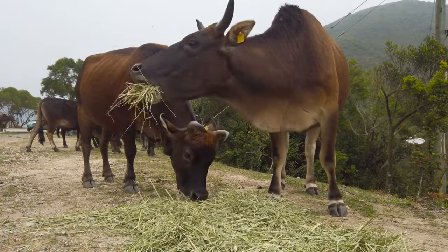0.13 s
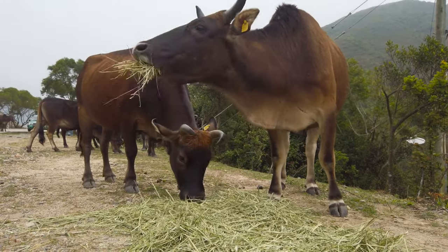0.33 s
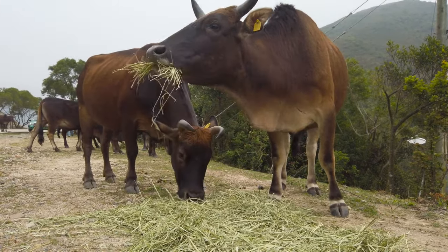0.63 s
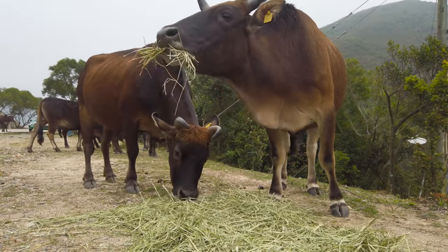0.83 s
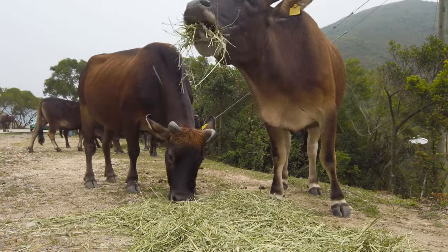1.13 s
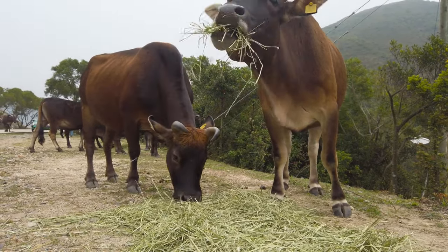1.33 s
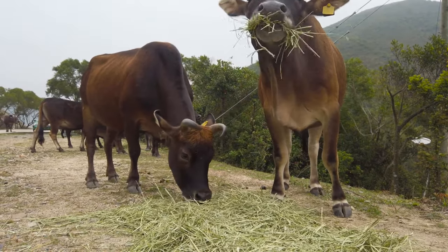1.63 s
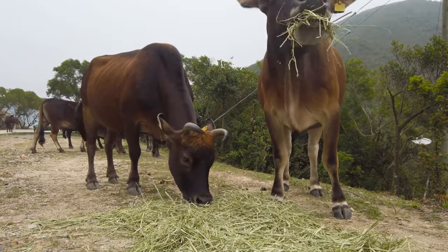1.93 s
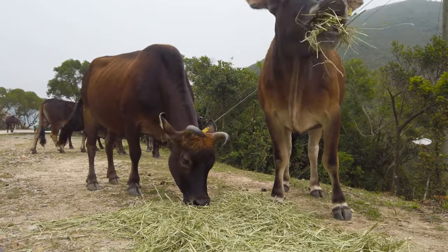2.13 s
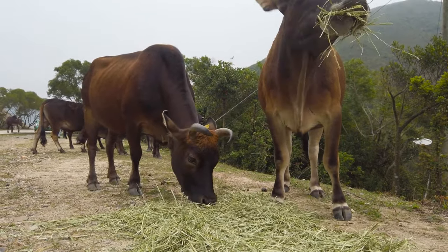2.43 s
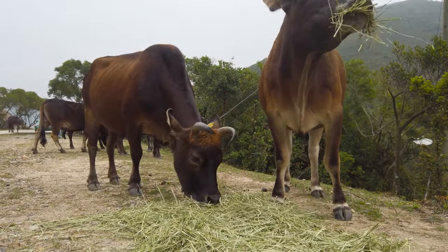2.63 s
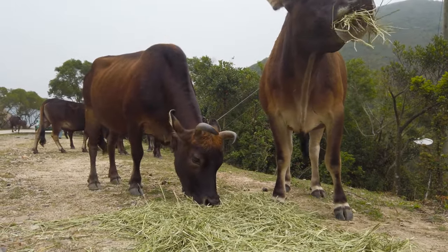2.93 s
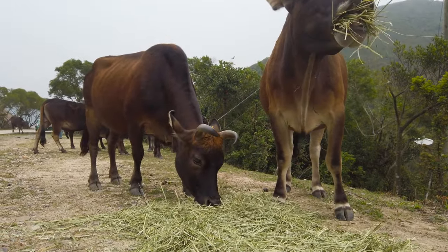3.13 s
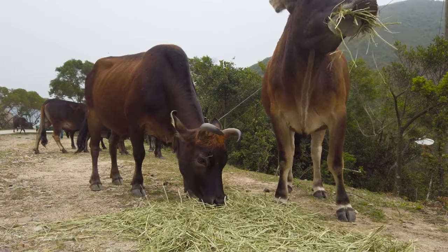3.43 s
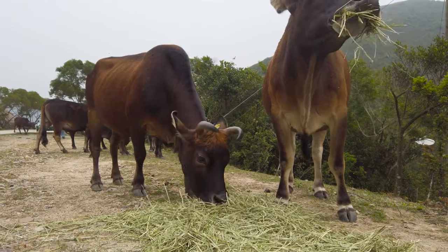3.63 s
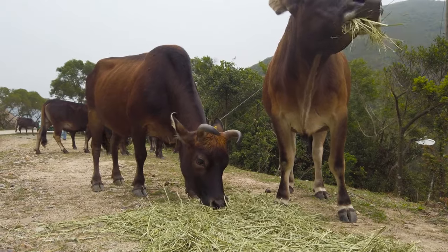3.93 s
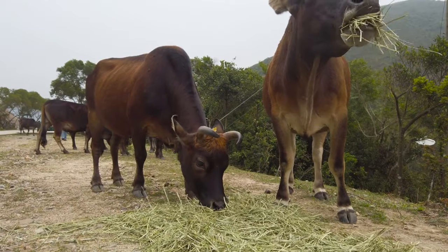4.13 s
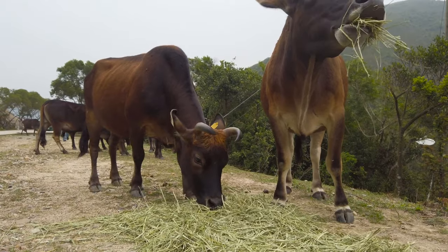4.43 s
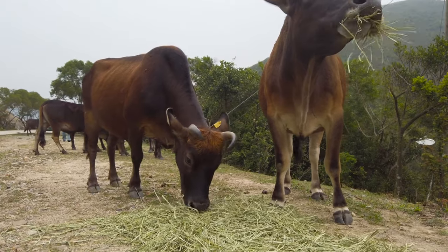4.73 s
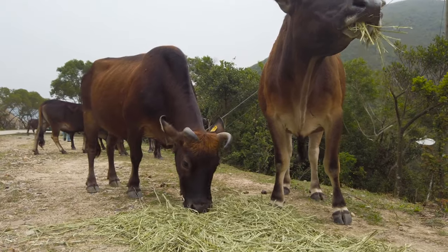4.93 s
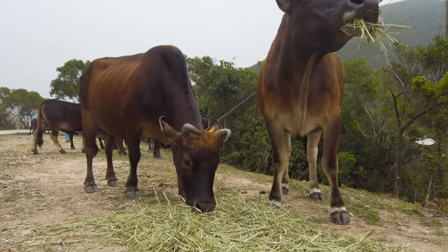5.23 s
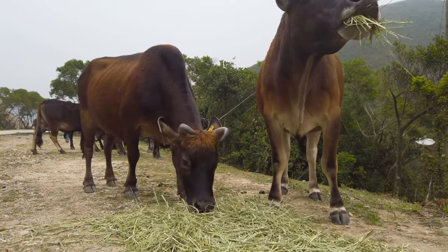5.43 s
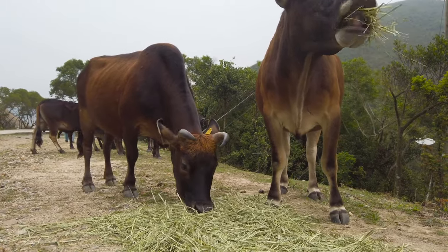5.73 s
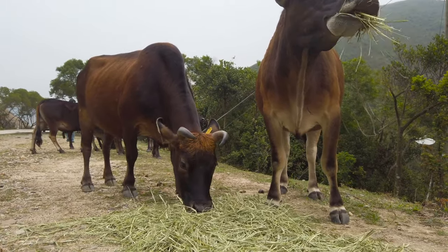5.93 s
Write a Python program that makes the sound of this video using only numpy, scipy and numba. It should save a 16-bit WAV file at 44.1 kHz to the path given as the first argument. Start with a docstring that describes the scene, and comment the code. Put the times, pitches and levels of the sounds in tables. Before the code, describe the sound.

Cattle crunch and grind dry hay at close range, stalks snapping and rustling, while low wind rumbles against the microphone on an open hillside.

```python
"""Cattle tear and chew hay a step or two from a small two-port microphone on an open hillside.
From the start, filtered noise makes wind buffets and the soft hiss of the far slope.
Showers of short rings make the jaw's grind and the rustle and steady crunch of hay; strokes and stirs swell.
Dull jaw knocks, each one low ring, start almost at once. A moment later come bites, denser crunching,
and single stalks snapping in small groups of rings. Later, straws tick and the hardest stalks pop."""
import sys
import numpy as np
from scipy import signal
from scipy.io import wavfile
from scipy.ndimage import uniform_filter1d
from numba import njit

SR = 44100
rng = np.random.default_rng(int(sys.argv[2]) if len(sys.argv) > 2 else 0)


def master(y):
    """Save y as 16-bit WAV."""
    cut = np.clip(np.atleast_2d(y).T, -1, 1)
    pcm = np.round(cut * 32767)  # scale
    wavfile.write(sys.argv[1], SR, pcm.astype(np.int16))


N = 267598  # length [samples]

# Wind pushing on the microphone: (time [s], relative rumble level [dB])
WIND_GUSTS = [(0.0, -21.5), (0.45, -18.5), (0.68, -23.5), (0.88, -17.5), (1.12, -32), (1.48, -17.5),
              (1.66, -29.5), (1.92, -24.5), (2.25, -34), (2.88, -20.5), (3.15, -26), (3.45, -28.5),
              (3.68, -23), (3.85, -29.5), (4.2, -28.5), (4.32, -19.5), (4.6, -24.5), (5.85, -24.5),
              (6.07, -29.5)]
# Puffs of quicker eddies: (start [s], hold [s], relative flutter level [dB])
WIND_PUFFS = [(0.0, 0.041, -26), (0.743, 0.033, -22.5), (0.868, 0.027, -25), (1.13, 0.034, -32),
              (1.266, 0.022, -24.5), (1.362, 0.14, -35), (1.666, 0.11, -34.5), (2.102, 0.071, -35.5),
              (2.327, 0.077, -28), (2.515, 0.15, -24.5), (4.236, 0.041, -24.5), (4.454, 0.31, -35.5),
              (5.113, 0.046, -31)]
FLUTTER_REST_DB = -38.5  # relative level between puffs

# Colour of the far slope's hiss: (frequency [Hz], relative level per Hz [dB])
SLOPE_COLOUR = [(35, -30), (60, 0), (103, -22), (176, -2.5), (354, -15), (437, -15.5), (2190, -19.5),
                (2460, -28.5), (12000, -30.5), (15900, -48)]
SLOPE_DB = -42  # rms, before the hollows and the ground

# Grinding strokes of the jaw: (start [s], hold [s], level before filtering [dB], pitch [Hz])
JAW_STROKES = [(0.027, 0.03, -34.5, 261), (0.132, 0.034, -32, 246), (0.534, 0.036, -32.5, 292),
               (0.706, 0.053, -37, 161), (1.056, 0.023, -35, 176), (1.226, 0.093, -33, 261),
               (1.422, 0.1, -33.5, 180), (1.697, 0.073, -35, 202), (2.11, 0.3, -39, 180),
               (2.556, 0.19, -36, 180), (3.039, 0.044, -40.5, 258), (3.594, 0.094, -35.5, 288),
               (3.963, 0.024, -37, 234), (4.299, 0.04, -34.5, 228), (4.443, 0.13, -34.5, 208),
               (4.702, 0.026, -33, 238), (4.84, 0.035, -34, 193), (5.178, 0.15, -40.5, 216),
               (5.944, 0.13, -43.5, 244)]
GRIND_REST_DB, GRIND_REST_HZ = -40.5, 180  # steady grinding, before filtering
# Loose hay stirred: (start [s], hold [s], rustle level [dB])
HAY_STIRS = [(0.0, .33, -50.5), (0.575, 0.045, -45.5), (0.843, 0.045, -45), (1.197, 0.42, -51),
             (1.714, 0.1, -46), (3.48, 0.036, -49), (4.147, 0.1, -46.5), (4.492, 0.18, -49),
             (4.758, 0.025, -44), (5.27, 0.074, -42.5), (5.623, 0.034, -45), (5.773, 0.19, -46.5)]
RUSTLE_REST_DB = -52.5
# Bites, stalks crushed between the molars:
# (start [s], hold [s], thick stalk level before filtering [dB], thin stalk level before filtering [dB])
MOLAR_BITES = [(0.139, 0.027, -36, -47), (1.19, 0.083, -41.5, -53), (1.261, 0.049, -35.5, -43),
               (1.327, 0.15, -40.5, -67), (1.634, 0.11, -45, -53.5), (1.749, 0.043, -35, -43.5),
               (2.096, 0.042, -44, -44), (2.17, 0.025, -57, -49), (2.292, 0.032, -48, -49.5),
               (2.615, 0.16, -42.5, -54), (2.87, 0.021, -41.5, -52), (3.262, 0.09, -44.5, -54),
               (3.454, 0.02, -52, -52), (3.485, 0.027, -39, -62), (3.62, 0.025, -39, -60),
               (3.671, 0.024, -37, -46), (3.697, 0.044, -45, -51), (4.109, 0.061, -38.5, -49),
               (4.438, 0.065, -38, -51), (4.563, 0.1, -50, -52), (5.285, 0.054, -44, -56),
               (5.67, .02, -40, -69), (5.927, 0.086, -39.5, -52)]
THICK_REST_DB, THIN_REST_DB = -45.5, -47  # steady chewing, before filtering
LOUD_SHARE = 0.985  # under 1 keeps a random grain from towering over the rest

# Jaw knocks: (time [s], size before filtering [dB], pitch [Hz], time to fade 60 dB [s])
JAW_KNOCKS = [(0.022, -27.5, 201, 0.1), (0.132, -17, 157, 0.038), (0.275, -21, 211, 0.037),
              (1.063, -17, 142, 0.056), (2.132, -23.5, 152, 0.085), (2.46, -25.5, 222, 0.065),
              (2.847, -28, 199, 0.13), (3.067, -29, 188, 0.081), (3.669, -22, 335, 0.095),
              (3.958, -16, 246, 0.025), (4.288, -21, 200, 0.04), (4.5, -24, 207.3, 0.34),
              (4.696, -20, 270, 0.1), (4.855, -14, 150, 0.035), (5.193, -24, 248, 0.051)]

# Single stalks breaking: (time [s], woody ring size [dB], woody ring pitch [Hz],
# crack size before filtering [dB], crack pitch [Hz])
STALK_SNAPS = [(0.142, -31, 1380, -26, 2050), (0.313, -36.5, 1100, -29.5, 2130),
               (0.447, -45, 990, -28, 2680), (0.497, -36, 1010, -24.5, 3900), (0.607, -42, 510, -20, 4270),
               (0.783, -32, 530, -22.5, 3100), (0.975, -33.5, 685, -36, 2000),
               (1.068, -25.5, 1500, -34, 2080), (1.1875, -32, 1150, -35, 1300),
               (1.214, -31, 700, -41, 1500), (1.27, -28.5, 1000, -36, 2800), (1.281, -32, 890, -30, 2200),
               (1.309, -29, 515, -37, 2000), (1.684, -37, 800, -26, 2400), (1.76, -28, 1170, -28, 3520),
               (1.898, -31.5, 840, -32, 2200), (2.053, -44, 1000, -26, 4200), (2.176, -39, 503, -23, 4230),
               (2.5165, -36, 1000, -23, 1500), (2.667, -31.5, 775, -34, 1980),
               (2.747, -35.5, 1210, -31, 1500), (2.8544, -28.5, 500, -34, 1600),
               (2.861, -26, 523, -39, 1000), (3.313, -32.5, 920, -31, 2780), (3.4515, -37, 2000, -26, 2700),
               (3.465, -38, 2000, -27, 2680), (3.6125, -31, 890, -25, 2000),
               (3.6185, -30, 930, -26.5, 3000), (3.6672, -27, 800, -18, 2670),
               (3.6735, -33, 720, -20, 2370), (3.709, -37, 1200, -37, 1700), (3.725, -32, 1240, -41, 2000),
               (3.744, -34, 1520, -41, 1700), (4.289, -27.5, 513, -33, 1500),
               (4.453, -29.5, 715, -47, 2800), (4.5936, -33, 4040, -19.5, 1900),
               (4.601, -33, 1400, -42, 1990), (4.6435, -29, 775, -20, 2750), (4.651, -36, 760, -40, 1400),
               (4.858, -33, 1530, -45, 2430), (5.0665, -42, 1910, -25.5, 2220),
               (5.285, -33.5, 760, -36, 2220), (5.672, -35, 720, -43, 1800), (5.955, -29.5, 520, -21, 2070),
               (6.03, -29, 440, -40, 1500)]
# Thin dry straws ticking: (time [s], size [dB], pitch [Hz])
STRAW_TICKS = [(0.859, -37, 7420), (1.6906, -38, 6820), (1.801, -28, 10700), (2.2323, -36, 5780),
               (2.9217, -40, 6770), (5.2764, -36, 5760), (5.321, -34, 5890)]
# Hard stalks popping: (time [s], size before filtering [dB], pitch [Hz])
STALK_POPS = [(2.8548, -10.5, 895), (3.619, -13, 1300), (3.6731, -17, 1150), (4.2884, -13, 1100),
              (5.672, -11.5, 1100)]

# Hollows of mouth and skull: (centre [Hz], width [Hz], boost or cut [dB])
MOUTH_HOLLOWS = [(360.3, 69, 7.5), (443, 108, -3), (498, 16.6, 6), (1220, 154, 2)]
GROUND_MS, GROUND_DB = 1.423, -15  # delay and gain of the echo, before its filter
OFFSET, TOP_HZ = -0.0094, 15780  # the converter's shift off zero and its upper limit


def undb(db):
    """Turn decibels into a gain."""
    return 10 ** (np.asarray(db) / 20)


def level(x, db):
    """Scale a sound to a given rms level."""
    return x * undb(db) / np.sqrt(np.mean(x ** 2))


def band(x, lo_hz, hi_hz, order=2):
    """Keep the part of a sound between two frequencies."""
    edges = [lo_hz, min(hi_hz, 0.45 * SR)]
    return signal.sosfilt(signal.butter(order, edges, "bandpass", fs=SR, output="sos"), x)


def walk(rate):
    """Random values held 1 / rate seconds and smoothed twice; spread near 1."""
    k = int(SR / rate)
    steps = np.repeat(rng.standard_normal(N // k + 1), k)
    return 1.3 * uniform_filter1d(uniform_filter1d(steps, k), k)[:N]


def swells(start, hold, db, rise_s, fall_s):
    """Power of each event over time: it rises 10 dB in rise_s, holds, and falls 10 dB in fall_s."""
    t = np.arange(0, N, 32) / SR - start[:, None]  # one value per 32 samples
    before = np.maximum(-t / rise_s, 0)
    after = np.maximum((t - hold[:, None]) / fall_s, 0)
    power = undb(2 * (db[:, None] - 10 * (before + after)))
    return np.repeat(power, 32, axis=1)[:, :N]


def gain(power, rest_db):
    """Events add their power to a steady level; the summed gain is smoothed."""
    return uniform_filter1d(np.sqrt(power.sum(axis=0) + undb(2 * rest_db)), size=64)


@njit
def ring(s, hz, t60, size, lag_s, tilt):
    """Each grain is a fading sine that reaches the left port lag_s after the right one."""
    out = np.zeros((2, N))
    for k in range(len(s)):
        rate = complex(-np.log(1000) / t60[k], 2 * np.pi * hz[k])
        turn = np.exp(rate / SR)  # one sample of turning and fading
        for c in range(2):
            t = (s[k] + (lag_s[k] if c == 0 else 0.)) * SR
            first = int(np.ceil(t))
            port_size = size[k] * (tilt[k] if c == 0 else 1 / tilt[k])
            z = port_size * np.exp(rate * (first - t) / SR)  # the start may fall between samples
            for j in range(max(first, 0), min(first + int(t60[k] * SR), N)):
                out[c, j] += z.imag
                z *= turn
    return out


def heard(s, hz, t60, size, lag_ms=0.0735, spread_ms=0.073, pan_db=-2.5, spread_db=4.0):
    """Grains reach the right port first on average, each from its own spot; negative pan is louder right."""
    lag_spot, pan_spot = rng.standard_normal((2, len(s)))
    lag_s = (lag_ms + spread_ms * lag_spot) / 1000
    tilt = undb((pan_db + spread_db * pan_spot) / 2)
    return ring(s, np.clip(hz, 20, 0.45 * SR), t60, size, lag_s, tilt)


def grains(count, hz, octaves, cycles, scatter_db, clump_db, clump_rate, **where):
    """A dense random shower of short rings in clumps, pitched round hz, rms 1; each fades 60 dB in cycles."""
    when, detune, loudness, sign = rng.random((4, count))
    at = (when * (N - 1)).astype(int)
    pitch = (hz + np.zeros(N))[at] * 2 ** (octaves * (detune - 0.5))
    scatter = -scatter_db * np.log(1 - LOUD_SHARE * loudness)
    clumps = clump_db * np.tanh(walk(clump_rate)[at])
    size = np.sign(sign - 0.5) * undb(scatter + clumps)
    return level(heard(when * N / SR, pitch, cycles / pitch, size, **where), 0)


def splinters(s, db, hz, t60, span_s, octaves, count, below=0.36):
    """A break comes in a few splinters within milliseconds, spread over a range round its pitch."""
    rank = np.tile(np.arange(count), len(s))
    s, db, hz, octaves = np.repeat([s, db, hz, octaves + np.zeros(len(s))], count, axis=1)
    delay, detune, sign = rng.random((3, len(s)))
    later = rank > 0  # the first splinter is the strongest and keeps the given pitch
    step = later * ((rank - detune) / (count - 1) - below)
    size = np.where(later, np.sign(sign - 0.7), -1) * undb(db - 9.0 * later)
    when = s + later * span_s * delay ** 2
    return heard(when, hz * 2 ** (octaves * step), np.full(len(s), t60), size, spread_db=-1.5)


def wind():
    """Eddies push both ports nearly alike: a deep rumble and a quicker flutter that comes in puffs."""
    s, db = np.transpose(WIND_GUSTS)
    rumble_gain = undb(np.interp(np.arange(N) / SR, s, db))
    puffs = swells(*np.transpose(WIND_PUFFS), rise_s=0.017, fall_s=0.033)
    flutter_gain = gain(puffs, FLUTTER_REST_DB)
    slow, mid, side, fast = rng.standard_normal((4, N))
    rumble = level(band(slow, 4.5, 16.2), -4.5) + level(band(mid, 13.5, 27.1), -0.62)
    flutter = level(band(fast, 31.2, 76.0) * undb(walk(20)), -0.99)
    apart = level(band(side, 5.4, 38), -25.0) * np.array([[1], [-1]])  # opposite in the two ports
    port_gain = undb([[-0.2], [0.2]])
    return (rumble_gain * (rumble + apart) + flutter_gain * flutter) * port_gain


def slope():
    """Grass and bushes hiss in half-octave bands that flicker alone; the ports differ less in the bass."""
    out = 0
    colour_hz, colour_db = np.transpose(SLOPE_COLOUR)
    for hz in 120 * 2 ** np.arange(0, 7.2, 0.5):
        mid, side = band(rng.standard_normal((2, N)), hz / 1.13, hz * 1.36, order=1)
        db = np.interp(np.log(hz), np.log(colour_hz), colour_db)
        flicker_db = 0.8 * walk(9)
        width = min(hz / 720.0, 1.1)
        out = out + undb(db + flicker_db) * (mid + width * side * np.array([[1], [-1]]))
    return level(out, SLOPE_DB)


def grinding():
    """The jaw bones carry a dull grind: low rings that swell with each stroke."""
    s, hold, db, hz = np.transpose(JAW_STROKES)
    strokes = swells(s, hold, db, rise_s=0.023, fall_s=0.04)
    grind_gain = gain(strokes, GRIND_REST_DB)
    # the louder stroke sets the pitch
    grind_hz = GRIND_REST_HZ + (hz - GRIND_REST_HZ) @ strokes / grind_gain ** 2
    grind = grains(count=2400, hz=grind_hz, octaves=1.22, cycles=18.0, scatter_db=3.5,
                   clump_db=4.5, clump_rate=25, spread_ms=0.24, spread_db=0.5, pan_db=-0.5)
    return grind_gain * band(grind, 101, 510)  # flesh and bone dull the onsets


def rustling():
    """Dry leaves of loose hay rustle in tiny high rings, louder when stirred."""
    stirs = swells(*np.transpose(HAY_STIRS), rise_s=0.06, fall_s=0.035)
    rustle = grains(count=36000, hz=9000, octaves=2.8, cycles=0.99, scatter_db=1.5,
                    clump_db=6.5, clump_rate=50, spread_ms=0.15, pan_db=0.5)
    return gain(stirs, RUSTLE_REST_DB) * rustle


def crunching():
    """Stalks crunch between the molars: thick ones ring lower and longer than thin ones."""
    s, hold, thick_db, thin_db = np.transpose(MOLAR_BITES)
    rise_s, fall_s = 0.0069, 0.0087
    thick_gain = gain(swells(s, hold, thick_db, rise_s, fall_s), THICK_REST_DB)
    thin_gain = np.sqrt(swells(s, hold, thin_db, rise_s, fall_s).sum(axis=0))
    thick = grains(count=5000, hz=884, octaves=2.224, cycles=11.9, scatter_db=1.85,
                   clump_db=2.0, clump_rate=40)
    thin = grains(count=7000, hz=2850, octaves=1.67, cycles=6, scatter_db=1.5,
                  clump_db=4.5, clump_rate=60)
    # flesh and bone dull the onsets of the thick stalks
    thick_crunch = thick_gain * band(thick, 335, 3900, order=1)
    steady_thin = undb(THIN_REST_DB) * band(thin, 1580, 6400, order=1)
    bitten_thin = thin_gain * band(thin, 610, 5100)  # a closed mouth muffles the bites
    return thick_crunch + steady_thin + bitten_thin


def knocks():
    """Teeth meet and the skull rings low, fading quickly; the soft push dulls the onset."""
    s, db, hz, t60 = np.transpose(JAW_KNOCKS)
    return band(heard(s, hz, t60, undb(db), spread_db=-3.5, pan_db=1.5), 82, 470, order=1)


def snaps():
    """A breaking stalk gives a woody ring and a broad crack made of several splinters."""
    s, db, hz, crack_db, crack_hz = np.transpose(STALK_SNAPS)
    woody = splinters(s, db, hz, t60=0.035, span_s=0.00406, octaves=np.log2(2000 / hz),
                      count=6, below=0.22)
    crack = splinters(s, crack_db, crack_hz, t60=0.005, span_s=0.00301, octaves=1.33,
                      count=8, below=0.69)
    return woody + band(crack, 530, 4300)


def ticks():
    """Thin dry straws only tick: very short, high splinters."""
    s, db, hz = np.transpose(STRAW_TICKS)
    return splinters(s, db, hz, t60=0.0052, span_s=0.015, octaves=0.77, count=16)


def pops():
    """The hardest stalks pop in one dry pulse that fades within two cycles."""
    s, db, hz = np.transpose(STALK_POPS)
    return band(heard(s, hz, 1.9 / hz, -undb(db), spread_db=1.5), 200, 3500, order=1)


def hollows(x):
    """Each hollow of mouth and skull lifts or swallows a band; here it colours the slope's hiss too."""
    for hz, width, db in MOUTH_HOLLOWS:
        x = x + (undb(db) - 1) * signal.lfilter(*signal.iirpeak(hz, hz / width, SR), x)
    return x


def ground(x):
    """The trodden earth returns the middle tones a moment late."""
    delay = round(GROUND_MS * SR / 1000)
    late = np.pad(band(x, 1640, 4200, order=1), ((0, 0), (delay, 0)))[:, :N]
    return x + undb(GROUND_DB) * late


def scene():
    """All sources at the two ports; the wind acts on the microphone itself, without hollows or ground."""
    chewing = grinding() + rustling() + crunching()
    breaks = snaps() + ticks() + pops()
    return wind() + ground(hollows(slope() + chewing + knocks() + breaks))


def record(dry):
    """The converter sits slightly off zero and cuts the top."""
    return signal.sosfilt(signal.ellip(10, 0.2, 80, TOP_HZ, fs=SR, output="sos"), dry + OFFSET)


dry = scene()
out = record(dry)
master(out)
```